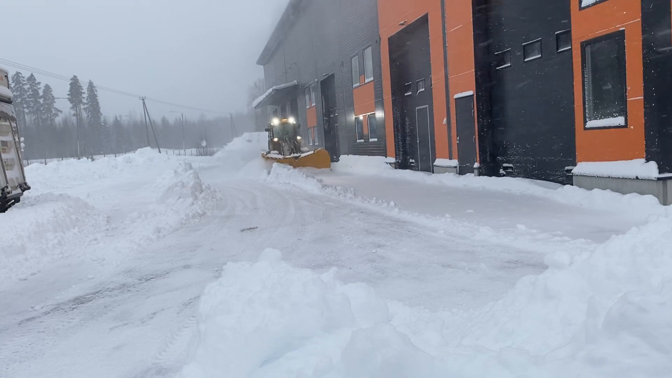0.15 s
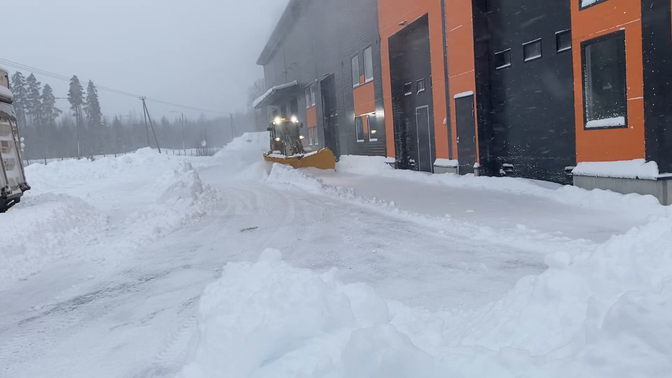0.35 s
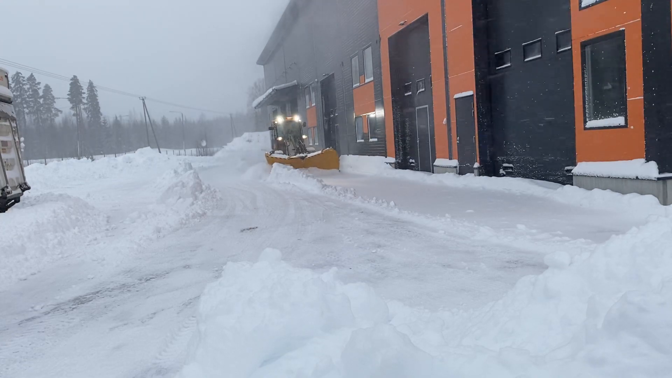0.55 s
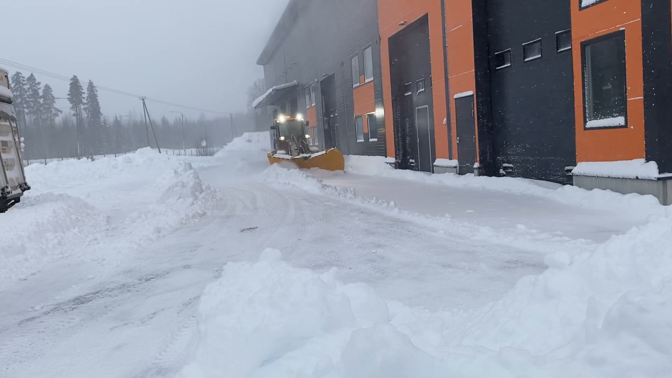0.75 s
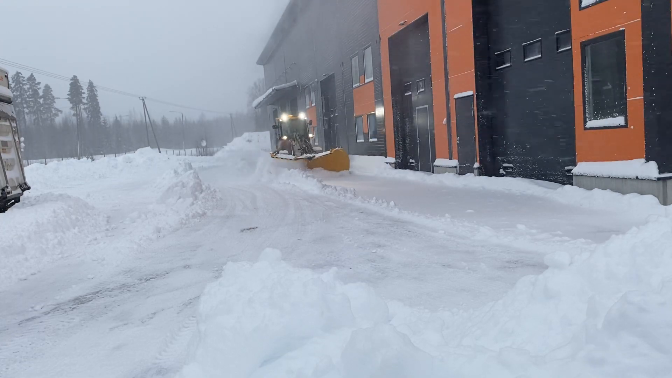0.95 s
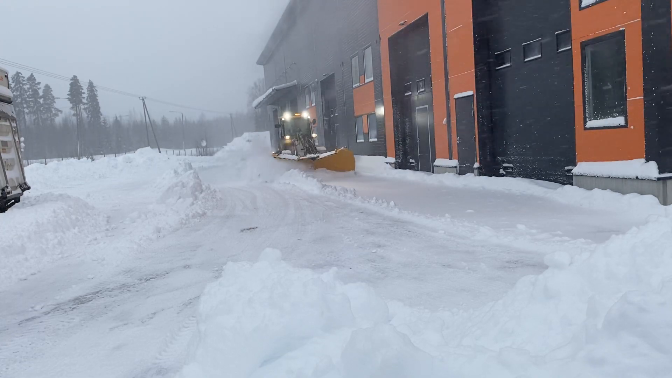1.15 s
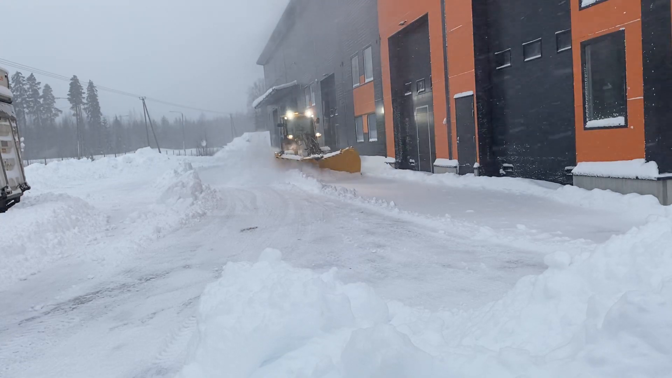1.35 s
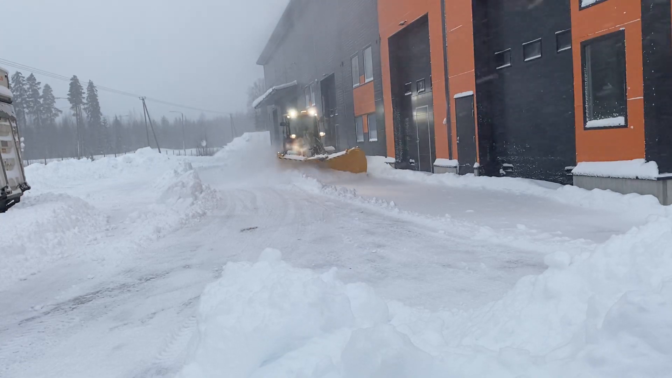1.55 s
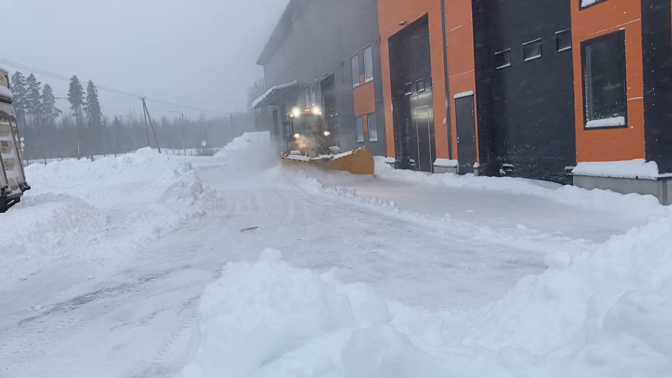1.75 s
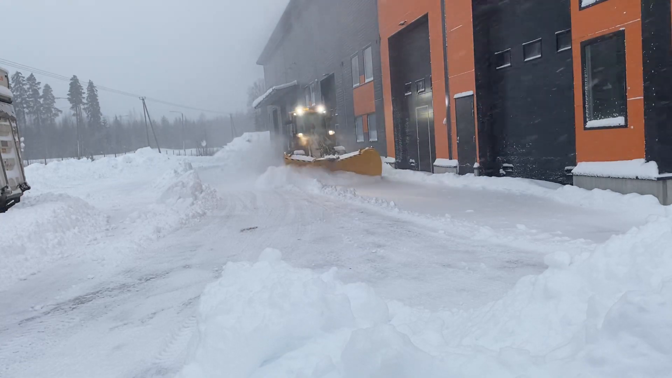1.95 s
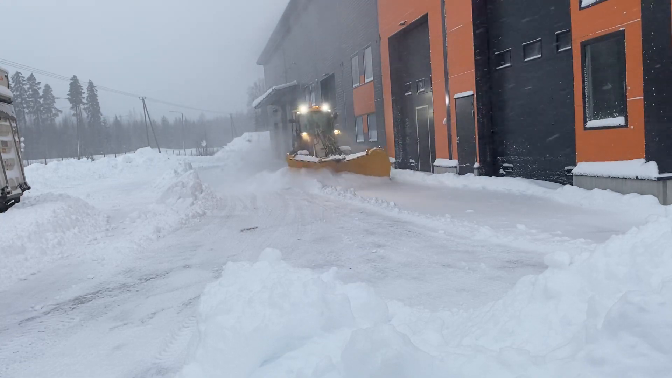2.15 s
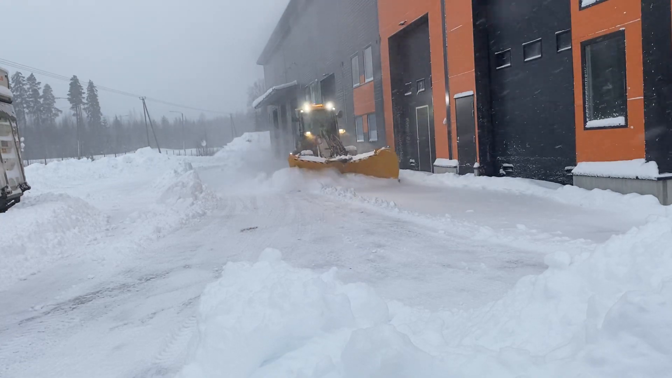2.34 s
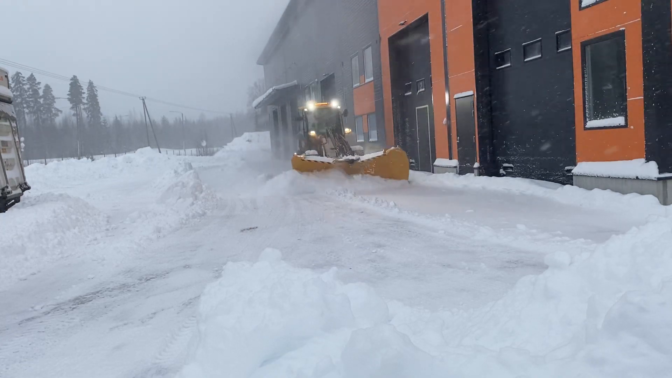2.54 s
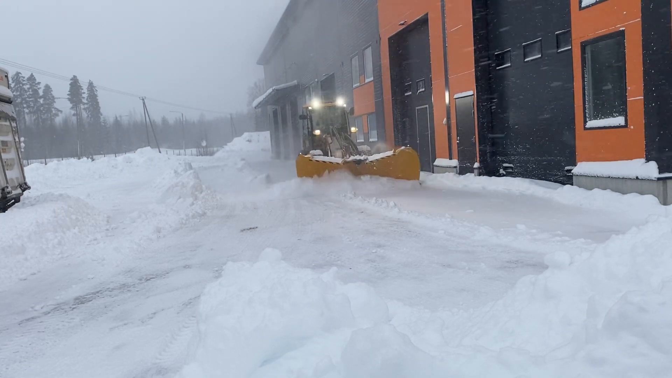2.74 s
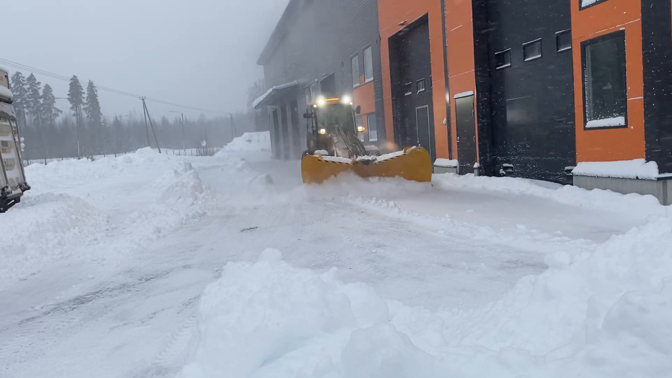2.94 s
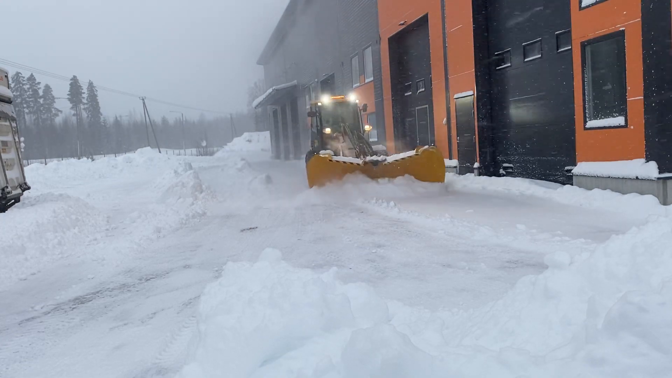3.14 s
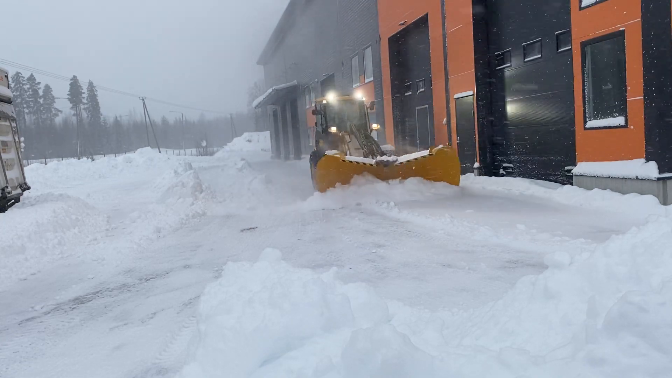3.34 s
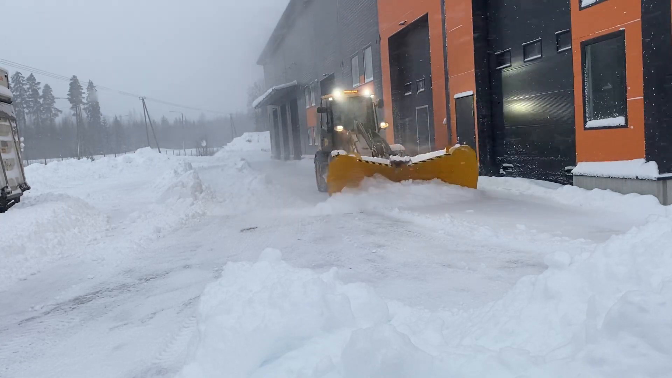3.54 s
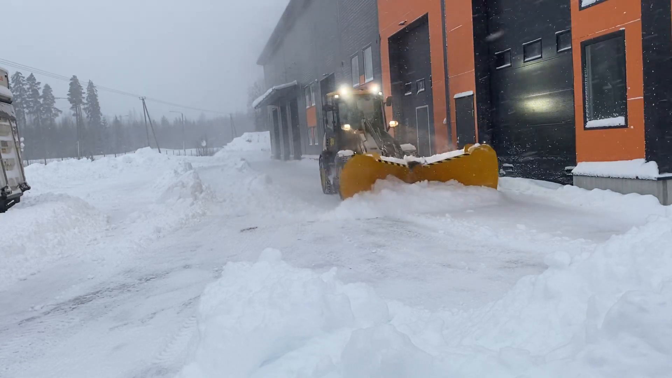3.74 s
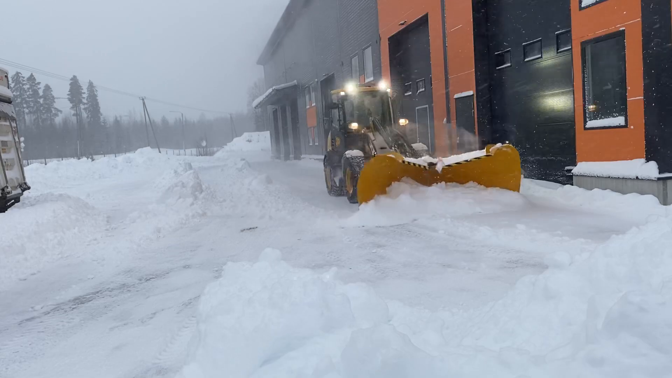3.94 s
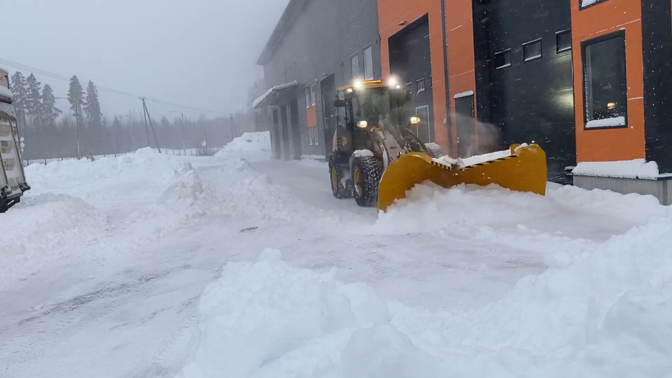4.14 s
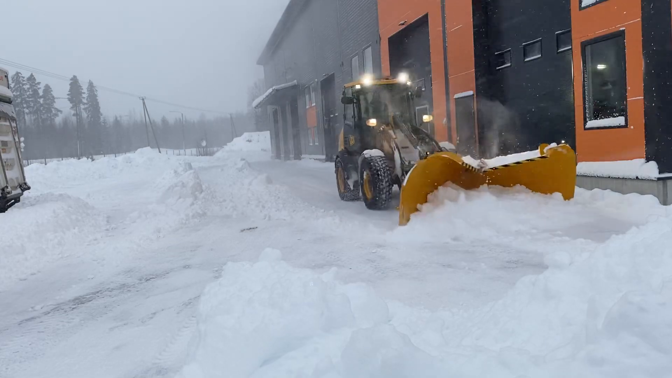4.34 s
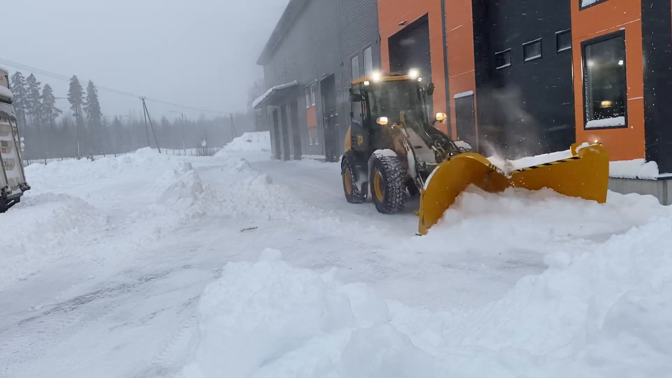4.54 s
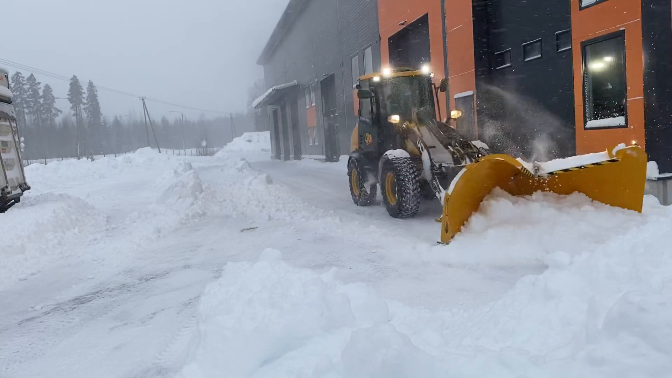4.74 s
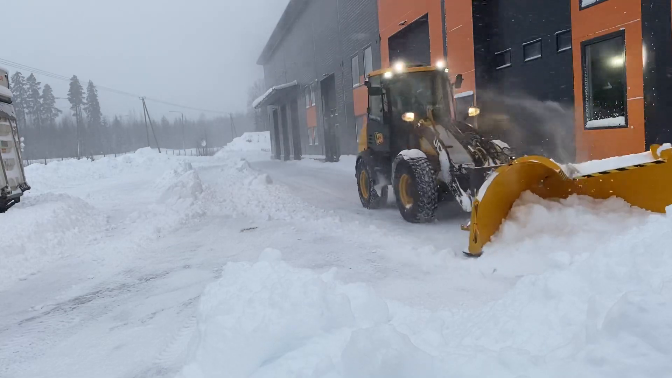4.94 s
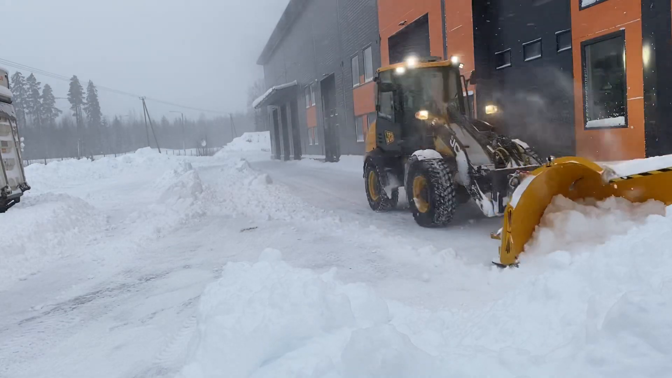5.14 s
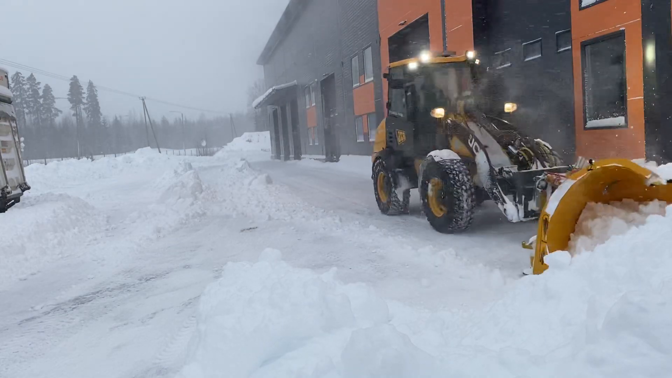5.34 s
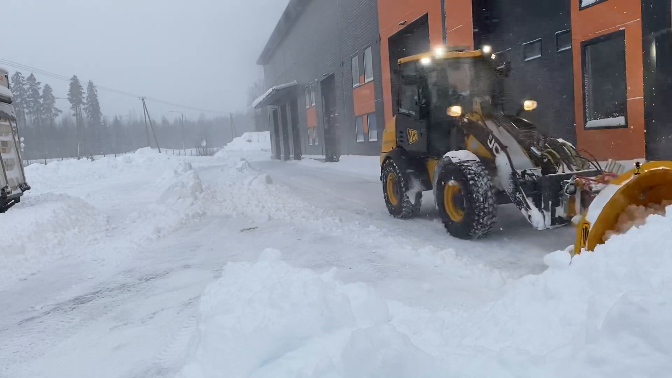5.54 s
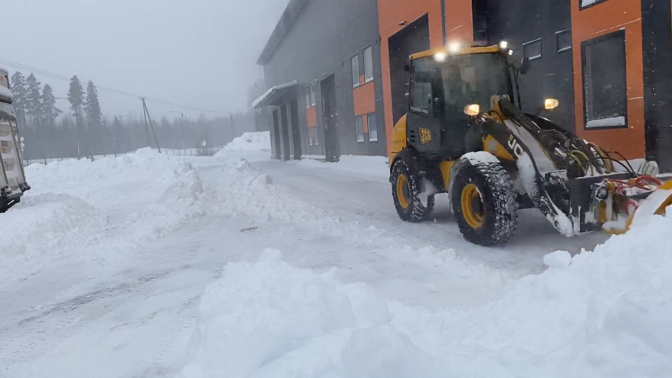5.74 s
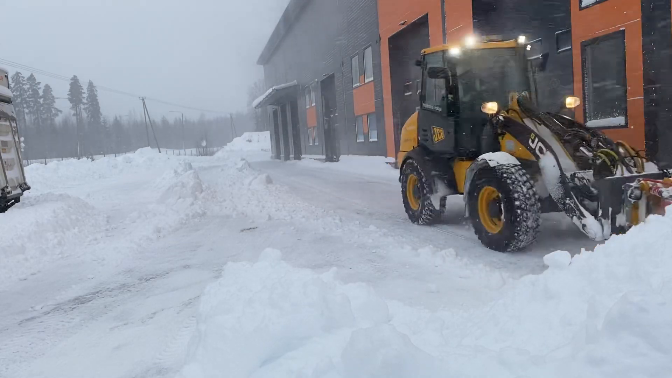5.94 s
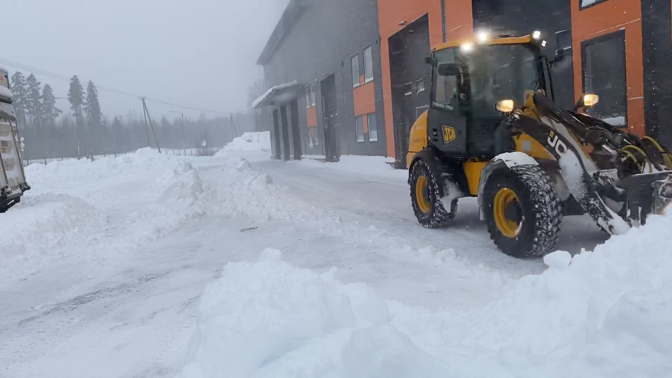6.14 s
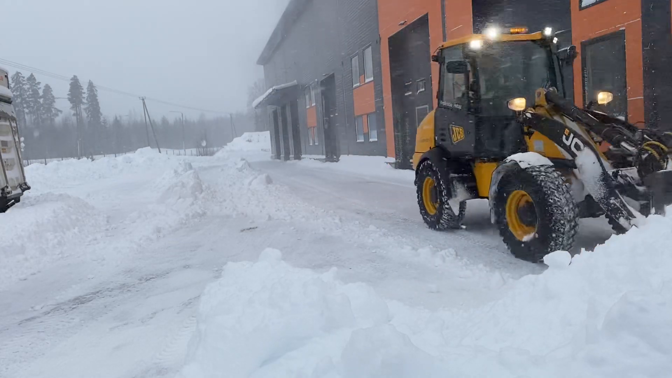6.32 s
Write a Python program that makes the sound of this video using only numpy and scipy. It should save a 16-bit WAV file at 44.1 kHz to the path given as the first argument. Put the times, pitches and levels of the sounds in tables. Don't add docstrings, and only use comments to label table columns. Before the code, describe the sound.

At 0 s, wind flutters and pops on a small stereo microphone outdoors, over a distant diesel hum, soft clatter and a fan whirr swelling near 0.5 s. Faint knocks and gritty grinding start around 1 s, with a short scrape and dull boom at 1.4-1.6 s. It eases to hissing grit and small stone ticks until 2.6 s, when knocks return and the engine clatters closer. From 3 to 5.4 s the steel plow scrapes roughly and strikes frozen lumps in quick, irregular clanks, strongest around 3.7-4.6 s, with short damped rings, low booms, crisp ticks and ice crunches. The engine pitch sinks as it slows. A very heavy wind thump hits at 5.26 s. After 5.5 s the blows stop; lighter scraping, gear whine and airy snow hiss remain, and a hydraulic whine surges near 6.4 s as the engine picks up slightly. Walls and snow banks scatter short echoes.

```python
import sys
import numpy as np
from scipy import signal
from scipy.fft import rfft, irfft, next_fast_len
from scipy.io import wavfile
from scipy.ndimage import uniform_filter1d

SR = 44100
rng = np.random.default_rng(int(sys.argv[2]) if len(sys.argv) > 2 else 0)


def makeup_ratio(level_db):
    decades = np.asarray(level_db, float) / 20
    return 10 ** decades


def transcribe(signal):
    frames = np.atleast_2d(signal).T
    limited = np.clip(frames, -1, 1)
    pcm = np.round(limited * 32767).astype(np.int16)
    wavfile.write(sys.argv[1], SR, pcm)


N = 285768
T = np.arange(N) / SR
PADDED = next_fast_len(N + 4096)
HZ = np.fft.rfftfreq(PADDED, 1 / SR)


def evened(x):
    return x / np.sqrt(np.mean(x ** 2) + 1e-20)


def read(points, hz):
    f, value = np.transpose(points)
    return np.interp(np.log(hz + 1), np.log(f + 1), value)


def columns(rows):
    s, *rest = np.transpose(rows)
    return [np.interp(T, s, c) for c in rest]


def swells(rows, floor_db):
    s, db, rise, fall = np.transpose(rows)[:, :, None]
    before = (s - T) / np.maximum(rise, .005)
    after = (T - s) / np.maximum(fall, .005)
    away = np.where(T < s, before, after)
    return np.maximum((db - 12 * away).max(axis=0), floor_db)


def coloured(x, points):
    gain_db = np.maximum(read(points, np.fft.rfftfreq(4096, 1 / SR)), -100)
    log_gain = gain_db * np.log(10) / 20
    full = np.concatenate([log_gain, log_gain[-2:0:-1]])
    taps = np.fft.ifft(np.exp(np.conj(signal.hilbert(full)))).real
    return signal.oaconvolve(x, taps / np.linalg.norm(taps))[:len(x)]


def ringing(x, modes):
    out = np.zeros(len(x))
    for k, (hz, width, db) in enumerate(modes):
        out += (-1) ** k * makeup_ratio(db) * signal.lfilter(*signal.iirpeak(hz, hz / width, SR), x)
    return out


def lumps(per_s, depth_db):
    steps = rng.standard_normal(N // 32 + 2000)
    slow = signal.butter(2, per_s, fs=SR / 32, output="sos")
    steps = evened(signal.sosfilt(slow, steps)[1998:])
    smooth = np.interp(T, np.arange(len(steps)) * 32 / SR, steps)
    return evened(makeup_ratio(depth_db * smooth))


def bursts(per_s, spread_db, t60):
    sizes_db = spread_db * np.minimum(rng.exponential(1, N), 4)
    slips = (rng.random(N) < per_s / SR) * makeup_ratio(2 * sizes_db)
    power = signal.lfilter([1], [1, -makeup_ratio(-120 / t60 / SR)], slips)
    power = abs(uniform_filter1d(power, size=260))
    return evened(np.sqrt(power) * rng.standard_normal(N))


def struck(times, peaks_db, t60s, rise, hold=1):
    out, t = np.zeros(N + 8000), np.arange(8000) / SR
    noise = rng.standard_normal((len(times), 8000))
    for s, db, t60, puff in zip(times, peaks_db, t60s, noise):
        shape = np.minimum(t / rise, 1)
        out[round(s * SR):][:8000] += makeup_ratio(db - 60 * (t / max(t60, .005)) ** hold) * shape * puff
    return out[:N]


# start_s, ground_pressure_db, bare_ice_db
SCRAPE = [(0.0, -38, -58), (0.63, -46, -52.5), (1.33, -34, -47.5), (1.48, -24.5, -38), (1.64, -39, -42),
          (2.0, -40.5, -41), (2.45, -55, -36), (2.96, -27, -41.5), (3.39, -33, -29), (3.75, -18, -32),
          (4.06, -30.5, -30), (4.31, -21, -79), (4.49, -41, -52), (4.62, -28, -35.5), (4.96, -33.5, -49),
          (5.17, -25, -36), (5.58, -38.5, -51), (6.48, -33.5, -39.5)]
# pitch_hz, level_db (per Hz)
BLADE = [(150, -41), (250, -1.5), (388, -3.5), (447, 13.5), (531, 0), (702, 9.5), (826, -4.5), (885, -33),
         (960, -39), (1170, 2), (1740, -3), (2820, -29.5), (4000, -39), (5200, -33), (8800, -120)]
# pitch_hz, level_db (per Hz)
GRIT = [(1470, -19), (2500, -3.5), (3450, -2.5), (4300, -3.5), (5050, -1.5), (5600, -10), (6900, -5),
        (8500, -13.5), (10900, -16.5), (12500, -25.5), (14000, -28.5), (15500, -57)]
# pitch_hz, width_hz, level_db
RINGS = [(575, 263, -3.5), (720, 60, 5.5), (881, 58, -4), (1180, 68, -12.5), (1370, 185, -6), (1712, 82, 0),
         (1960, 160, -5.5), (1960, 900, -14.5), (2460, 81, -10), (2700, 1000, -21)]


def blade():
    level_db, grit_db = columns(SCRAPE)
    slips = bursts(370, 0.74, 0.051)
    body = evened(coloured(slips, BLADE)) + 0.089 * evened(ringing(slips, RINGS))
    grit = .5 * slips + bursts(260, 4.4, 0.023)
    return makeup_ratio(level_db - 8) * evened(body) + makeup_ratio(grit_db - 16.5) * evened(coloured(grit, GRIT))


# start_s, level_db (peak), hardness_db, pitch_hz (favoured ring)
KNOCKS = [(0.9482, -30.5, -11, 1700), (0.981, -25, -18, 1560), (1.4445, -25.5, -28, 1580),
          (2.6205, -24, -30, 1180), (2.6698, -27.5, -31, 1210), (3.0206, -15, -41, 1167),
          (3.1664, -30.5, -25, 1750), (3.236, -23, -26, 1240), (3.2975, -29, 3, 1190),
          (3.493, -23, 9.5, 1940), (3.563, -18, -12, 1310), (3.6207, -15.5, -31, 1250),
          (3.729, -12, -14, 1180), (3.811, -23, -17, 881), (3.8412, -26, 11.5, 1570),
          (4.0646, -20, -19, 1010), (4.0995, -12, -6.5, 974), (4.25, -13.5, -8, 910),
          (4.296, -24, -11, 2140), (4.3448, -12.5, -8, 1790), (4.4507, -8.5, -8.5, 1420),
          (4.5573, -18, -17, 1450), (4.704, -19.5, -7, 1630), (4.8025, -22, -25, 1540),
          (4.8669, -21, -37, 1310), (5.0917, -15, -18, 1660), (5.2475, -16, -25, 1610),
          (5.346, -23, -2.5, 1600), (5.3927, -24, -23, 1340)]
# start_s, level_db (peak), hardness_db, pitch_hz
DRAGS = [(1.469, -23, -7.5, 1420), (1.5845, -26.5, -12, 1370), (2.2964, -29, 6, 1550),
         (2.6961, -25.5, -30, 1520), (3.0632, -25.5, -10, 1440), (3.3433, -24.5, -0.5, 1140),
         (3.7623, -18.5, -6, 1540), (3.8776, -20.5, -20, 915), (3.95, -17, -12, 1050),
         (4.162, -26, -30, 1650), (4.3976, -16, -16, 840), (5.0577, -23, -12, 1630),
         (5.157, -19.5, -18, 1600), (3.692, -18.5, -6, 1290), (1.099, -37, -13, 1440),
         (1.166, -35.5, -13, 1610), (1.215, -33.5, -21, 1450), (1.26, -33, -11, 1580),
         (1.357, -31.5, -8, 1600), (1.389, -33, -11, 1700), (1.411, -37, -5, 1350), (1.5, -30, -20, 1350),
         (1.526, -31.5, -26, 1400), (1.556, -28.5, -26, 1510), (3.649, -24, -22, 1240),
         (3.785, -24, -14, 2030), (4.905, -51, -20, 1770), (5.005, -33, -12, 2300), (5.071, -20, -16, 1580)]
KNOCK_T60_S, DRAG_T60_S = 0.056, 0.11
RISE_S, LOW_RISE_S = 0.00048, 0.0028
HOLD = 1.553
DAMPING = 2.2


def knocks():
    out, t = np.zeros(N), np.arange(8000) / SR
    hits = [(*row, KNOCK_T60_S) for row in KNOCKS] + [(*row, DRAG_T60_S) for row in DRAGS]
    noise = rng.standard_normal((len(hits), 8000))
    spot = rng.standard_normal((len(hits), len(RINGS), 2))
    for (s, db, _, hz, t60), puff, shifts in zip(hits, noise, spot):
        low_db = -7.5 - 0.00085 * (hz - 1400)
        rise = np.minimum(t / (RISE_S * (t60 / KNOCK_T60_S) ** 2), 1)
        shape = rise * makeup_ratio(-60 * (t / t60) ** HOLD)
        low_shape = np.minimum(t / LOW_RISE_S, 1) ** 2 * makeup_ratio(-60 * (t / (1.9 * t60)) ** HOLD)
        rings = [(f * (1 + 0.09 * a), DAMPING * width, ring_db + 2.4 * b)
                 for (f, width, ring_db), (a, b) in zip(RINGS, shifts)]
        puff = puff * (.5 + abs(evened(uniform_filter1d(puff[::-1], size=70))))
        middle = ringing(puff * shape, rings[3:] + [(hz, 350, 1.5)])
        middle = evened(middle) * np.sqrt(np.mean(shape ** 2))
        low = ringing(puff * low_shape, rings[:3])
        out[round(s * SR):][:8000] += makeup_ratio(db - 10) * middle + makeup_ratio(db + low_db + 3) * low
    s, db, hardness_db, _, t60 = np.transpose(hits)
    crack = coloured(struck(s, db + hardness_db - 10.5, 0.62 * t60, 0.0018, hold=1.51), GRIT)
    dull = signal.butter(3, 7000, fs=SR, output="sos")
    edge = signal.butter(3, 2600, fs=SR, output="sos")
    return signal.sosfilt(edge, out) * 1.53 + signal.sosfilt(dull, crack)


# start_s, level_db (peak), pitch_hz, t60_s
THUDS = [(1.39, -37, 696, 0.13), (1.5, -19.5, 400, 0.074), (3.4, -41, 1053, 0.12), (3.622, -24, 660, 0.075),
         (3.622, -14.5, 1190, 0.052), (3.69, -23, 606, 0.15), (3.73, -12.5, 786, 0.056),
         (3.745, -28, 630, 0.071), (3.808, -20, 500, 0.065), (3.882, -19, 578, 0.13),
         (3.95, -22, 448, 0.039), (4.27, -20.5, 456, 0.16), (4.4, -19, 733, 0.067), (4.6, -27, 455, 0.12),
         (4.766, -26, 630, 0.14), (4.804, -22, 503, 0.1), (4.864, -19, 493, 0.076), (4.9, -29.5, 734, .12),
         (4.983, -28.5, 460, 0.27), (5.04, -30, 776, 0.1), (5.1, -24, 880, 0.073),
         (5.126, -17.5, 430, 0.093), (5.164, -28, 513, 0.13), (5.18, -15, 563, 0.064),
         (5.205, -37, 634, .1), (5.348, -20.5, 522, 0.082), (5.394, -35, 607, 0.13),
         (5.427, -28, 524.5, 0.094)]


def thuds():
    out, t = np.zeros(N), np.arange(8000) / SR
    for (s, db, hz, t60), puff in zip(THUDS, rng.standard_normal((len(THUDS), 8000))):
        shape = np.minimum(t / 0.0015, 1) * makeup_ratio(-60 * (t / t60) ** HOLD)
        tone = .45 * np.sin(2 * np.pi * hz * t)
        rough = evened(ringing(ringing(puff, [(hz, 150, 0)]), [(hz, 600, 0)]))
        out[round(s * SR):][:8000] += makeup_ratio(db - 3.5) * shape * (tone + rough)
    return out


# start_s, level_db (peak), lower_band_db (relative)
TICKS = [(0.695, -44, -7), (1.896, -40.5, 5.5), (2.112, -50, 9.5), (2.171, -33.5, -8), (2.2967, -45, 12),
         (2.49, -50, 9), (2.71, -37.5, 4), (2.783, -35.5, -8), (2.875, -32.5, -31), (3.0093, -27.5, -15),
         (3.062, -30.5, -16), (3.1803, -34.5, -1), (3.254, -36.5, 4), (3.322, -30, -7), (3.4139, -27.5, -8),
         (3.495, -33.5, 5), (3.626, -39, 8), (3.6707, -27.5, -5), (3.696, -35, 6), (3.788, -41, 12.5),
         (3.8396, -38.5, 14), (4.0076, -35, 3), (4.2404, -40, 4), (4.3057, -35.5, 0), (4.3404, -36.5, 6),
         (4.7445, -25, -8), (4.747, -31, -2), (4.866, -33, -30), (5.074, -40, 3), (6.1219, -43, -22)]
TICK_T60_S, TICK_RISE_S = .008, .0007


def ticks():
    s, db, lower_db = np.transpose(TICKS)
    top = signal.butter(4, [6800, 14000], "band", fs=SR, output="sos")
    high = signal.sosfilt(top, struck(s, db + 5, s * 0 + TICK_T60_S, TICK_RISE_S))
    lower = struck(s, db + lower_db + 8, s * 0 + 1.46 * TICK_T60_S, 2 * TICK_RISE_S)
    return high + coloured(lower, GRIT)


# start_s, level_db (peak), pitch_hz (band centre), t60_s
CHIPS = [(3.457, -32, 5100, .02), (3.507, -29, 3680, 0.022), (3.787, -30, 5100, 0.037),
         (3.842, -31, 4500, 0.048), (3.845, -36.5, 7100, 0.044), (3.923, -35, 4600, 0.054),
         (4.03, -44, 9500, 0.013), (4.05, -40, 8500, .015), (4.213, -41, 10090, 0.014),
         (4.262, -40, 10400, 0.028), (4.756, -42, 7000, .03), (4.782, -34, 4550, 0.026),
         (4.868, -43, 7200, 0.02), (4.963, -45, 7000, 0.026), (5.003, -36, 2620, 0.074),
         (5.075, -40, 8200, .03), (5.18, -49, 7500, 0.025), (5.317, -38, 3170, 0.055),
         (5.15, -35, 3840, 0.042), (5.1, -35, 4500, 0.041), (3.6, -34, 4500, .04), (3.66, -43, 2700, 0.031),
         (3.761, -29.5, 3760, 0.027), (4.36, -35, 5500, 0.028), (4.41, -35, 4040, 0.03),
         (4.465, -38, 5000, 0.018), (4.243, -33, 4190, .05), (4.262, -36, 5460, 0.037),
         (4.295, -32, 3300, .04), (4.33, -33, 4010, .03), (3.96, -37, 3500, .04), (4.015, -35, 4500, 0.037),
         (4.065, -35, 3200, .04), (4.565, -30, 1900, .05)]


def chips():
    out, t = np.zeros(N), np.arange(4000) / SR
    for (s, db, hz, t60), puff in zip(CHIPS, rng.standard_normal((len(CHIPS), 4000))):
        band = [(hz, hz / 4.5, 0)]
        shape = np.minimum(t / .002, 1) * makeup_ratio(db - 6 - 60 * (t / t60) ** 2)
        out[round(s * SR):][:4000] += shape * evened(ringing(ringing(puff, band), band))
    return out


# start_s, firing_hz, exhaust_db, nearness_db, pipe_boom_db
ENGINE = [(0, 62.74, -31.5, -49, 5.5), (.6, 65, -44, -44.5, -3), (1.3, 64.65, -49, -44, 14.5),
          (2, 63.48, -37.5, -39, 2), (2.4, 62.54, -35.5, -37.5, 5), (2.8, 60.64, -25, -36.5, -9),
          (3.2, 59.75, -26.5, -36, -7), (3.7, 55.77, -36, -32, -4), (4.1, 53.44, -25.5, -33.5, -28),
          (4.6, 52.17, -55, -35.5, -5), (5.5, 49.43, -42, -38.5, 3), (5.9, 48.85, -33.5, -45, -13),
          (6.2, 49.78, -33.5, -43.5, -9), (6.35, 51, -27.5, -43, -5), (6.48, 52.2, -25, -40.5, -3.5)]
# pitch_hz, level_db (per Hz)
CLATTER = [(90, -31.5), (150, 3), (250, -9), (700, -6.5), (850, -9), (1400, -13), (2350, -19), (2620, -20),
           (2900, -24.5), (5000, -31.5), (5600, -36.5), (7000, -37), (9000, -43.5), (12000, -42),
           (15500, -46)]
# pitch_hz, width_hz, level_db
WHIRR = [(1171, 12, 12.5), (1440, 24, 5), (1640, 45, -24), (1980, 65, -5), (2620, 86, -1.5)]
# peak_s, level_db, rise_s, fall_s
WHIRRING = [
    (.45, -49.5, 0.37, 0.8),
    (1.05, -64, .4, .5),
]
# peak_s, level_db, rise_s, fall_s
SPRAY = [
    (6.45, -61.5, 0.67, .6),
    (5.6, -65.5, .15, 0.23),
    (1.4, -73, 0.27, 0.28),
]


def engine():
    hz, _, clatter_db, _ = columns(ENGINE)
    firing = np.cumsum(hz) / SR % 1
    puffs = (0.96 + np.exp(-firing / 0.29)) * rng.standard_normal(N)
    clatter = makeup_ratio(clatter_db + 1.5) * evened(coloured(puffs, CLATTER)) * lumps(24, 0.24)
    whirr = evened(ringing(rng.standard_normal(N), WHIRR)) * lumps(7.6, 1.8)
    hiss = signal.butter(4, [7500, 12200], "band", fs=SR, output="sos")
    spray = evened(signal.sosfilt(hiss, rng.standard_normal(N)))
    return clatter + makeup_ratio(swells(WHIRRING, -84)) * whirr + makeup_ratio(swells(SPRAY, -104)) * spray


# multiple (of firing rate), level_db
EXHAUST = [(2, -9), (3, -6), (4, -27), (5, -20), (6, -16.5), (7, -31), (8, -22.5)]
# multiple (of firing rate), level_db
PUMP = [(8.92, 0), (17.84, -15)]
# multiple (of firing rate), level_db
GEARS = [(6, -1), (12, -2), (15.3, -10), (17.2, -3)]
# peak_s, level_db, rise_s, fall_s
PUMPING = [
    (.45, -44, 1.5, 1.2),
    (.95, -46, 1.2, .6),
    (2.7, -49, .5, .4),
    (4.6, -42, .7, .35),
    (6.4, -33, .12, .6),
]
# peak_s, level_db, rise_s, fall_s
DRIVING = [
    (1.3, -58, .45, .45),
    (2.4, -63, .2, 1),
    (5.95, -42, 0.22, 0.87),
    (6.25, -40, 0.53, 0.48),
]
QUIET_DB = -62


def hum():
    hz, tone_db, _, boom_db = columns(ENGINE)
    pump_db, gear_db = swells(PUMPING, QUIET_DB), swells(DRIVING, QUIET_DB)
    strain_db = swells(PUMPING[-1:], QUIET_DB - 14)
    waver = 1 + .004 * np.log(lumps(5, 8.7))
    crank = np.cumsum(hz * waver) / SR
    axle = np.cumsum(np.minimum.accumulate(hz) * waver ** 2) / SR
    voices = [(tone_db + boom_db, crank, [(1, 0)], 1.3),
              (tone_db, crank, EXHAUST, 1.3),
              (pump_db, crank, PUMP, 1.3),
              (strain_db, crank, [(26.76, -11)], 1.3),
              (gear_db, axle, GEARS, 2.6)]
    tones = 0
    for level_db, turns, orders, wobble_db in voices:
        for k, db in orders:
            tone = np.sin(2 * np.pi * (k * turns + rng.random()))
            tones += makeup_ratio(level_db + db - 2) * lumps(5, .6 * wobble_db) * tone
    return tones


def yard():
    t = np.arange(4000) / SR
    echoes = rng.choice([-1., 1.], (2, 4000)) * (rng.random((2, 4000)) < .15)
    taps = echoes * makeup_ratio(-60 * t / 0.12) * (t > .002)
    return rfft(taps / np.linalg.norm(taps, axis=1, keepdims=True), PADDED)


# pitch_hz, likeness (0 to 1)
SAME = [(100, 0.77), (600, 0.52), (1500, 0.73), (3000, 0.66), (5500, 0.67), (8000, 0.39), (12500, 0.58),
        (15000, 0.55)]
# pitch_hz, level_db
LEAN = [(60, 0), (180, -0.5), (550, -3.5), (1650, -2), (4970, 1), (15000, -1.5)]
# pitch_hz, lead_rad
LEAD = [(0, 0), (500, .3), (1500, -.4), (3000, 0), (5300, 1.3), (6500, .3), (7300, 0), (7900, 2.2),
        (8900, 3.4), (9900, 6.2), (11750, 6.3), (12350, 9.4), (14300, 9.4), (14800, 12.5)]


def ports(x):
    same = np.clip(read(SAME, HZ), 0, 1)
    direct = np.sqrt(same) * np.exp([[.5j], [-.5j]] * read(LEAD, HZ))
    path = direct + np.sqrt(1 - same) * yard()
    path /= np.sqrt(uniform_filter1d(abs(path) ** 2, size=400, axis=1))
    lean = makeup_ratio([[.5], [-.5]] * read(LEAN, HZ))
    return irfft(rfft(x, PADDED) * path * lean, PADDED)[:, :N]


# peak_s, level_db, rise_s, fall_s
GUSTS = [(.11, -27, 0.066, 0.21), (.3, -23.5, 0.019, 0.024), (.37, -29, 0.015, 0.091),
         (.77, -33.5, 0.17, 0.041), (.93, -33, 0.68, 0.089), (1.01, -30.5, 0.1, 0.099),
         (1.13, -32.5, 0.14, 0.16), (1.45, -28.5, 0.073, 0.055), (1.51, -26.5, 0.062, 0.04),
         (1.75, -40, 0.53, 0.25), (1.88, -32.5, 0.15, 0.15), (2.11, -38, 0.12, 0.064),
         (2.93, -30.5, 2.8, 0.23), (3.07, -28, 0.13, 0.15), (3.41, -27, 0.27, 0.16),
         (3.54, -31, 0.063, 0.68), (3.78, -26.5, 0.073, 0.096), (3.99, -27, 0.28, 0.041),
         (4.28, -29.5, 0.39, 0.36), (4.37, -26, 0.088, 0.065), (4.53, -26.5, 0.042, 0.23),
         (4.67, -27.5, 0.34, 0.12), (4.83, -26, 0.2, 0.17), (5.04, -26, 0.063, 0.036),
         (5.26, -27.5, 0.22, 0.02), (5.36, -30.5, .05, 0.044), (5.81, -34, 0.24, 0.2),
         (6.21, -31.5, 0.33, 0.14), (6.47, -28.5, 0.22, 0.094)]
# pitch_hz, level_db (per Hz)
BUFFET = [(15, -17.5), (30, -17.5), (45, 4), (65, 7.5), (90, 3.5), (130, -2), (180, -6.5), (300, -23),
          (500, -34), (900, -82)]
# pitch_hz, level_db (per Hz)
FLUTTER = [(60, -17), (130, 1.5), (220, -2), (400, -1.5), (700, -15.5), (1200, -26), (2500, -98),
           (5000, -105)]


def eddies():
    level_db = swells(GUSTS, -41.5)
    spread_db = uniform_filter1d(level_db, round(0.027 * SR))
    flutter_db = -36 + 1.5 * (spread_db + 31.5)
    low = evened(coloured(rng.standard_normal(N), BUFFET)) * lumps(22, 2.3)
    flutter = evened(coloured(bursts(160, 0.67, 0.019), FLUTTER)) * lumps(20, 2.4)
    return makeup_ratio(level_db - 1.5) * low + makeup_ratio(flutter_db) * flutter


# start_s, level_db (peak)
POPS = [(0.061, -16.5), (0.095, -12), (0.126, -24), (0.148, -15.5), (0.157, -23), (0.165, -30),
        (0.188, -21), (0.282, -14), (0.288, -22), (0.34, -21), (0.386, -18), (0.394, -19.5), (0.412, -26.5),
        (0.658, -30), (0.827, -25), (0.705, -16), (0.74, -22.5), (0.751, -24), (0.799, -23.5), (0.852, -21),
        (0.938, -23), (1.102, -18), (1.126, -14.5), (1.429, -23), (1.517, -15), (1.845, -28), (1.889, -18),
        (2.09, -19), (2.537, -16.5), (2.905, -16), (2.982, -15), (3.281, -12.5), (3.371, -13), (3.402, -11),
        (4.688, -16), (5.262, -1.5), (5.532, -20.5), (5.81, -29), (5.835, -25), (6.137, -25), (6.2, -25),
        (6.217, -20.5), (6.358, -20.5), (6.445, -25)]
# start_s, level_db (peak), pitch_hz (swing)
THUMPS = [(0.086, -23, 110), (0.2, -27, 149), (0.255, -28, 75), (0.295, -19, 128), (0.362, -24, 109),
          (4.513, -18.5, 140.4), (4.528, -16, 190), (4.545, -18.5, 89), (4.577, -19.5, 270),
          (4.588, -19, 127), (4.624, -21, 203), (4.643, -17.5, 156.2), (4.657, -19, 202), (4.702, -20, 230),
          (0.305, -21.5, 95), (3.965, -16, 91), (3.98, -18, 130), (4.555, -21, 75), (3.41, -17.5, 270),
          (0.71, -23.5, 170)]
# pitch_hz, level_db (per Hz)
FLAP = [(100, -34), (200, -10), (400, 5.5), (600, -1), (900, -10), (1300, -16.5), (2500, -44), (5000, -65)]


def wind():
    shared, apart = eddies(), eddies()
    t = np.arange(1500) / SR
    swing = np.sin(2 * np.pi * 260 * (t - 12 * t ** 2)) * (t / 0.0025) * np.exp(1 - t / 0.0017)
    for s, db in POPS:
        shared[round(s * SR):][:1500] -= makeup_ratio(db - 5) * swing
    for s, db, hz in THUMPS:
        turns = hz * t
        fade = np.sin(np.pi * np.minimum(turns / (2 * 1.004), 1))
        shared[round(s * SR):][:1500] -= makeup_ratio(db) * np.sin(2 * np.pi * turns) * fade
    s, db = np.transpose(POPS)
    flaps = coloured(struck(s, db - 13, s * 0 + 0.025, 0.002, hold=1.83), FLAP)
    return shared + flaps + makeup_ratio(-8) * apart * [[1], [-1]]


def scene():
    loader = ports(blade() + knocks() + thuds() + ticks() + engine())
    loader = loader + hum() * makeup_ratio([[-.7], [.7]])
    return loader + ports(chips()) + wind()


def band_limit(x):
    return signal.sosfilt(signal.butter(12, 17060, fs=SR, output="sos"), x)


def record(dry):
    bass_cut = signal.butter(2, 23, "high", fs=SR, output="sos")
    mix = signal.sosfilt(bass_cut, dry)
    mix = signal.oaconvolve(mix, signal.firwin(511, 15750, fs=SR)[None], "same")
    return band_limit(mix)


dry = scene()
out = record(dry)
transcribe(out)
```